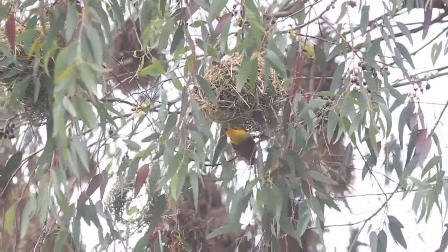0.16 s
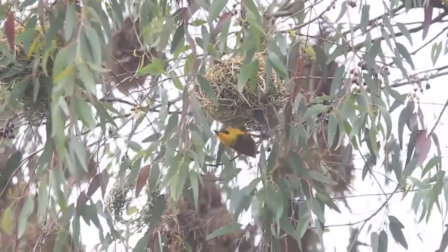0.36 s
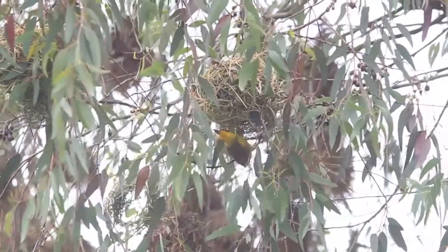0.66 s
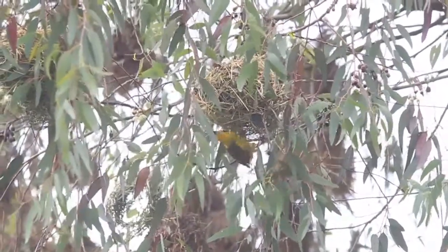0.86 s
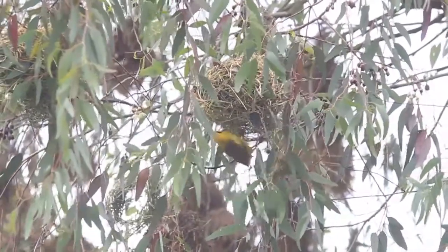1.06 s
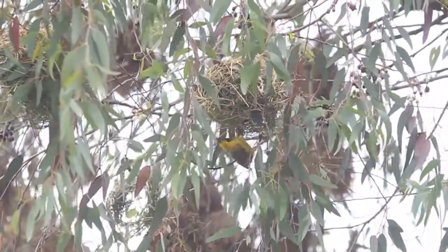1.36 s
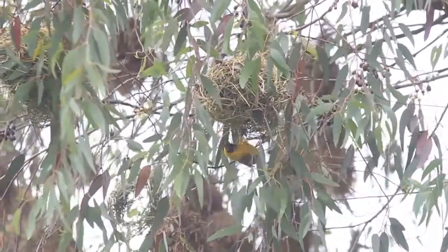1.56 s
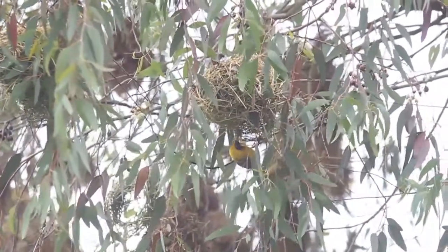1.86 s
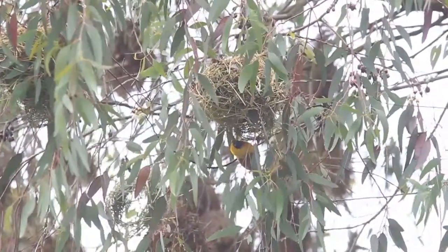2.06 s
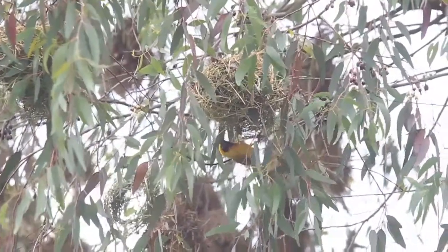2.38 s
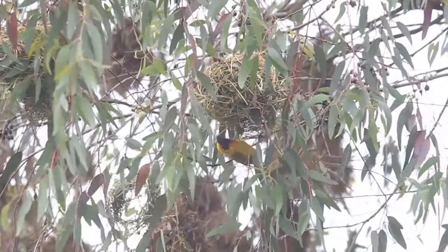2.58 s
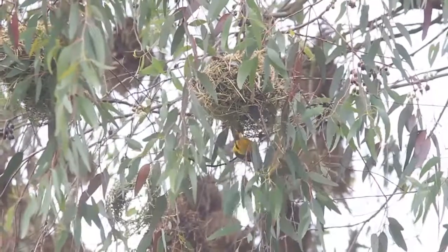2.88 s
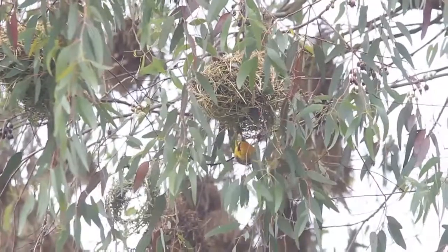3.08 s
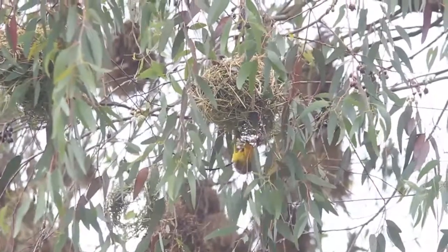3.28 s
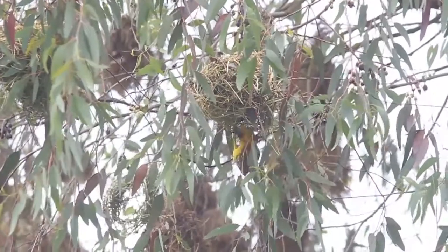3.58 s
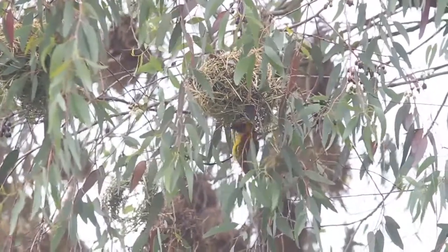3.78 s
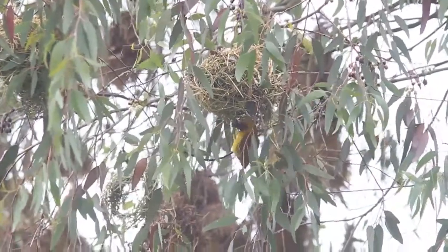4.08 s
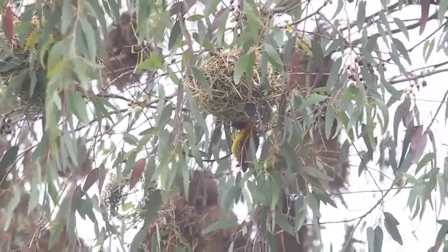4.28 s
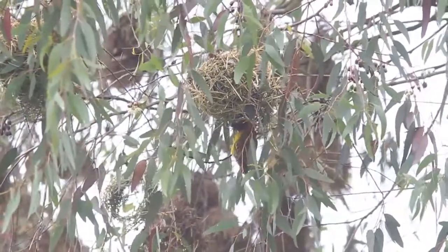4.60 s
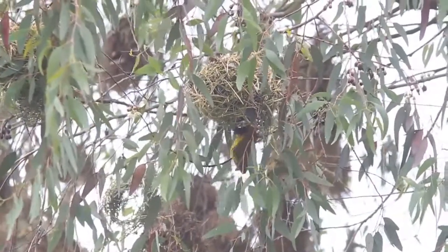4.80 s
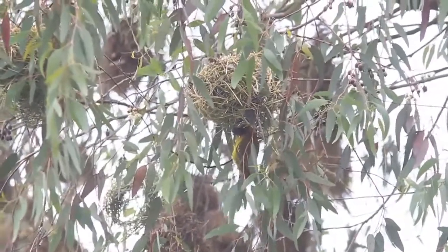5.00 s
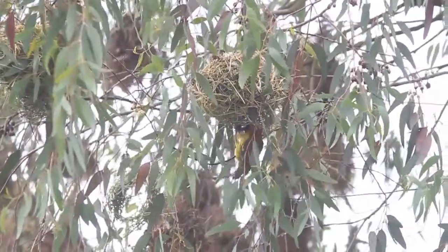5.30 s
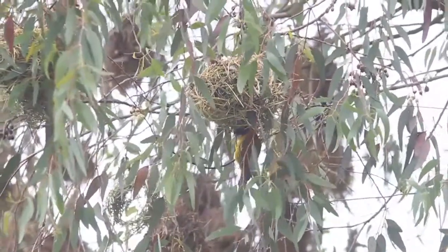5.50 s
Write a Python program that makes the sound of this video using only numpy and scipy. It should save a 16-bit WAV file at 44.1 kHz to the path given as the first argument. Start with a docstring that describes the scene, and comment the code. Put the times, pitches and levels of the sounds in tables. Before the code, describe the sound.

Small birds chip, rasp, whistle and buzz in a tree, ending with a brief rub and sharp knock near the microphone.

```python
"""Weaver colony in a tree

The nearest bird chips and rasps, gives two loud falling whistles, then runs into a pulsed buzzing
song. Whistles and chips are gliding tones; rasps and buzzes are snaps of the syrinx coloured by the
throat. Neighbours slur and twitter behind it over steady air, and the foliage scatters every call.
At the end a small hard body rubs close to the microphone and gives one sharp knock with a rebound."""
import sys
import numpy as np
from scipy import signal
from scipy.fft import rfft, irfft
from scipy.io import wavfile
from scipy.ndimage import uniform_filter1d

SR = 44100
rng = np.random.default_rng(int(sys.argv[2]) if len(sys.argv) > 2 else 0)


def master_out(mix):
    """Clip the mix to full scale and print it as 16-bit PCM to the path in sys.argv[1]."""
    frames = np.transpose(np.atleast_2d(mix))
    ceiling = np.clip(frames, -1, 1)
    pcm = np.round(ceiling * 32767).astype(np.int16)
    wavfile.write(sys.argv[1], SR, pcm)


N = 249165
TIME = np.arange(N) / SR
TOP_HZ = 15500


def undb(db):
    """Decibels to gain."""
    return 10 ** (np.asarray(db) / 20)


def unit(x):
    """Scale to rms 1."""
    return x / np.sqrt(np.mean(x ** 2) + 1e-18)


def add(track, start, sound):
    """Mix a sound into a track at a time in seconds."""
    i = max(int(start * SR), 0)
    track[i:i + len(sound)] += sound[:max(N - i, 0)]


def ramp(length):
    """Progress 0-1 through a note."""
    return np.linspace(0, 1, max(int(length * SR), 8))


def wobble(size, hz):
    """Smooth random modulation with a spread of about 1."""
    k = max(int(SR / hz), 1)
    noise = rng.standard_normal(size + 8 * k)
    return unit(uniform_filter1d(uniform_filter1d(noise, k), k))[4 * k:4 * k + size]


def colour(x, points):
    """EQ by a curve of (f/Hz, level/dB) points."""
    hz, db = np.transpose(points)
    bins = np.maximum(np.fft.rfftfreq(len(x), 1 / SR), 1)
    return irfft(rfft(x) * undb(np.interp(np.log(bins), np.log(hz), db)), len(x))


def resonate(x, hz, width):
    """One resonance, gain 1 at its centre."""
    return signal.lfilter(*signal.iirpeak(hz, hz / width, fs=SR), x)


def cycles(hz):
    """Phase of a moving pitch, in radians."""
    return 2 * np.pi * np.cumsum(hz) / SR


def arch(u, rise, fall):
    """Envelope with attack and release as shares of the note."""
    return np.sin(np.pi / 2 * np.clip(np.minimum(u / rise, (1 - u) / fall), 0, 1))


def note(hz, octave_db, rough, flutter_db=1.5, third_db=-25):
    """One gliding note at rms 1; an unsteady pitch makes it hoarse."""
    phase = cycles(hz * (1 + rough * wobble(len(hz), 1200)))
    overtones = undb(octave_db) * (np.sin(2 * phase) + undb(third_db) * np.sin(3 * phase))
    tone = (np.sin(phase) + overtones) * undb(flutter_db * wobble(len(hz), 113))
    return unit(tone * arch(np.linspace(0, 1, len(hz)), 0.051, 0.36))


def foliage(x, wet_db, t60=0.17, early_t60=0.018, late_db=-11, leaf_hz=2500):
    """Leaves and branches scatter mostly treble: a dense early cloud and a faint longer tail."""
    t = np.arange(SR // 2) / SR
    decay = 1000 ** (-t / early_t60) + undb(late_db) * 1000 ** (-t / t60)
    cloud = rng.standard_normal(len(t)) * decay * (t > .003)  # 3 ms pre-delay
    cloud = signal.sosfilt(signal.butter(2, leaf_hz, "high", fs=SR, output="sos"), cloud)
    return x + undb(wet_db) * signal.fftconvolve(x, cloud / np.linalg.norm(cloud))[:N]


# EQ of the outdoor bed: f/Hz, level/dB
AIR_EQ = [(15, 2), (25, 15), (33, 1), (130, -2.5), (300, -5), (700, -7), (880, -3.5), (1100, -8),
          (2400, -10.5), (3800, -8), (6800, -5.5), (8500, -16.5), (11000, -28.5), (15000, -37.5)]

def air(db=-48.5):
    """A quiet, steady bed of outdoor rumble and hiss."""
    return unit(colour(rng.standard_normal(N), AIR_EQ)) * undb(db)


# fader ride on the distant chatter: t/s, level/dB
COLONY_FADER = [(0, -44), (2.3, -64), (3.4, -59), (5.6, -43.5)]

def colony(count=1100, low_hz=2000, high_hz=6900, octave_db=-17):
    """Many distant chirps blur into a chatter among the leaves."""
    out = np.zeros(N)
    for start, length, pitch, glide, size in rng.random((count, 5)):
        u = ramp(.01 + 0.02 * length)
        sweep_hz = (low_hz + (high_hz - low_hz) * pitch) * (1 + (.2 - 0.5 * glide) * u)
        phase = cycles(sweep_hz * (1 + 0.089 * wobble(len(u), 1500)))
        tone = np.sin(phase) + undb(octave_db) * (1 - pitch) * np.sin(2 * phase)
        add(out, start * N / SR, undb(12 * size) * tone * arch(u, 0.42, 0.3))
    return unit(foliage(out, wet_db=-12)) * undb(np.interp(TIME, *np.transpose(COLONY_FADER)))


def twitter(hz, db, spread, rate=60, bend=0.129, run_s=.11, scatter_db=2.0, run_db=3):
    """A far bird trills on in runs of tiny arched notes, each run at a new pitch and strength."""
    out = np.zeros(N)
    u = ramp(0.63 / rate)
    runs = rng.uniform(-1, 1, (N // 100, 2))
    for k, (late, detune, size) in enumerate(rng.standard_normal((int(N / SR * rate), 3))):
        start = (k + 0.15 * late) / rate
        pitch, effort = runs[int(abs(start) / run_s)]
        arc_hz = hz * (1 + spread * pitch + 0.013 * detune) * (1 - bend * (2 * u - 1) ** 2)
        gain = undb(scatter_db * size + run_db * effort)
        add(out, start, gain * np.sin(cycles(arc_hz)) * arch(u, 0.09, 0.39))
    return undb(db) * unit(out)


# clear slurred notes: t/s, length/s, start f/Hz, middle f/Hz, end f/Hz, level/dB
CLEAR_SLURS = [(.0, 0.074, 1855, 1950, 2010, -49.5), (.225, 0.15, 3050, 2683, 2300, -48.5),
               (1.63, 0.21, 8350, 8400, 8500, -52), (2.106, 0.096, 2480, 2400, 2310, -54),
               (2.20, 0.22, 2450, 1876, 2250, -55), (2.443, 0.086, 2615, 2740, 2920, -46.5),
               (2.518, 0.041, 4370, 4820, 5140, -48.5), (2.524, 0.093, 3310, 2890, 2690, -43.5),
               (2.675, .061, 2730, 2620, 1960, -51), (2.855, 0.051, 3270, 3500, 1890, -37),
               (2.904, .069, 2120, 1660, 1590, -54), (3.33, 0.035, 3500, 4230, 4400, -64),
               (3.675, 0.049, 3620, 3670, 3100, -52), (4.802, 0.1, 2600, 2910, 3020, -42.5),
               (4.942, 0.089, 2650, 2450, 2430, -48)]
# hoarse squawks: t/s, length/s, start f/Hz, middle f/Hz, end f/Hz, level/dB
HOARSE_SQUAWKS = [(.259, .086, 2550, 3165, 3285, -33), (.476, .065, 2830, 3350, 3420, -43)]

def slurs(rows, octave_db, rough):
    """Neighbouring birds bend each note smoothly through three pitches."""
    out = np.zeros(N)
    for start, length, first, middle, last, db in rows:
        hz = np.polyval(np.polyfit([0, .5, 1], [first, middle, last], 2), ramp(length))
        add(out, start, undb(db) * note(hz, octave_db, rough))
    return out


# the near bird's chips: t/s, start f/Hz, level/dB
CHIP_CUES = [(.093, 6300, -33.5), (0.656, 4445, -35.5), (0.806, 4570, -33.5), (.964, 4454, -34),
             (1.218, 4250, -34.5), (1.365, 4450, -32), (1.625, 4450, -32), (1.768, 4500, -31),
             (1.926, 4350, -30.5), (4.434, 4306, -34.5), (4.738, 3986, -32), (4.923, 4140, -38),
             (5.09, 4550, -33), (5.247, 4230, -32.5)]

def chips(length_s=0.02163, fall=0.308, warble_hz=270, warble=0.068, rough=0.067, beak_hz=9200):
    """A warbled downward flick; partway the voice breaks to half pitch and turns harsh."""
    out, u = np.zeros(N), ramp(length_s)
    for start, hz, db in CHIP_CUES:
        vibrato = warble * np.sin(cycles(warble_hz * (1 + 0.213 * wobble(len(u), 196))))
        jitter = rough * (.5 + 2 * u) * wobble(len(u), 2500)
        phase = cycles(hz * (1 - fall * u) * (1 + vibrato + jitter))
        half_tones = undb(-7) * np.sin(phase / 2) + undb(-15) * np.sin(1.5 * phase)
        voice_break = np.clip(2 * u - .3, 0, 1)
        tone = np.sin(phase) + voice_break * half_tones + undb(-19) * np.sin(2 * phase)
        add(out, start, undb(db) * unit(tone * arch(u, .12, .65)))
    return signal.sosfilt(signal.butter(6, beak_hz, fs=SR, output="sos"), out)


def syrinx(size, throat_eq, hz, jitter, hiss_db, ring_s=0.0005):
    """Uneven snaps of the syrinx with a little turbulence, coloured by the throat."""
    pad = 512
    span = size + 2 * pad
    phase = cycles(hz * (1 + jitter * wobble(span, hz))) + 2 * np.pi * rng.random()
    snaps = unit(sum(np.cos(k * phase) for k in range(1, int(TOP_HZ / hz))))
    # the throat rings on for a moment after each snap
    t = np.arange(64) / SR
    ring = rng.standard_normal(len(t)) * np.exp(-t / ring_s)
    smear = np.exp(1j * np.angle(rfft(ring, span)))
    voice = irfft(rfft(snaps) * smear, span) + undb(hiss_db) * rng.standard_normal(span)
    return unit(colour(voice, throat_eq)[pad:pad + size])


# throat EQ of a rasp: f/Hz, level/dB
RASP_EQ = [(400, -24), (900, -10), (1500, -4), (3000, -1), (4200, -6), (5200, -3), (7700, -8),
           (9000, -18.5), (14000, -54.5)]
# single dry ticks: centre t/s, length/s, level/dB
RASP_CUES = [(.128, 0.037, -32.5), (.153, 0.0092, -33), (.363, 0.023, -32), (.396, 0.013, -40.5),
             (.484, .013, -36.5), (.533, 0.02, -35.5), (.739, 0.01, -32), (.894, 0.015, -34.5),
             (1.083, 0.018, -30), (1.155, 0.018, -37), (1.307, 0.012, -34), (1.56, 0.016, -33.5),
             (1.71, 0.015, -31), (1.846, 0.011, -32.5), (2.014, .011, -30), (2.084, 0.011, -31.5),
             (2.195, 0.013, -35.5), (2.538, 0.013, -39.5), (2.777, .015, -32.5), (4.815, 0.029, -34.5),
             (5.458, 0.013, -30)]
# even runs of ticks, the second leading into the song: first t/s, last t/s, gap/s, length/s, level/dB
RASP_RUNS = [(0.703, 1.361, .165, .0065, -32.5), (3.156, 3.422, .0535, .0085, -33)]

def rasps(hz=430, jitter=0.086, hiss_db=-4, squeak_hz=(3500, 4350), full_squeak_from_db=-34):
    """Dry ticks that swell and stop, alone or in even runs; the harder ones squeak more."""
    out = np.zeros(N)
    runs = [(centre, length, db) for first, last, gap, length, db in RASP_RUNS
            for centre in np.linspace(first, last, round((last - first) / gap) + 1)]
    for centre, length, db in list(RASP_CUES) + runs:
        u = ramp(2 * length)
        swell = np.exp(-((u - .5) / .21) ** 2)
        pitch = rng.uniform(*squeak_hz) * (1 + .025 * wobble(len(u), 900))
        squeak = undb(min(db - full_squeak_from_db, 0)) * np.sin(cycles(pitch)) * 2 * u
        voice = syrinx(len(u), RASP_EQ, hz, jitter, hiss_db) + squeak
        add(out, centre - length, undb(db) * swell * unit(voice))
    return out


# quick downward flicks, the last closing the first loud whistle: t/s, length/s, start f/Hz, level/dB
FLICK_CUES = [(0.16, 0.023, 5030, -47), (0.23, 0.016, 5040, -48), (.298, .029, 4820, -48),
              (0.337, 0.023, 6320, -38.5), (1.804, 0.012, 5750, -31.5), (2.495, 0.014, 4100, -43),
              (2.738, 0.0067, 4120, -30.5)]

def flicks(fall_octaves=0.69):
    """Thin, fast downward sweeps, all through the same interval."""
    out = np.zeros(N)
    for start, length, hz, db in FLICK_CUES:
        sweep_hz = hz * 2 ** (-fall_octaves * ramp(length))
        add(out, start, undb(db) * note(sweep_hz, octave_db=-34, rough=0.017))
    return out


# soft bumps among the twigs: t/s, level/dB
BUMP_CUES = [(0.288, -46), (1.053, -45), (3.225, -46.5), (4.81, -42), (5.273, -45.5)]

def bumps(hz=330, width_hz=400, length_s=0.019, dull_hz=1200):
    """Dull little thuds: puffs of noise through one broad, low resonance."""
    out, u = np.zeros(N), ramp(length_s)
    for start, db in BUMP_CUES:
        thud = unit(resonate(rng.standard_normal(len(u)), hz, width_hz))
        add(out, start, undb(db) * thud * arch(u, 0.073, 0.87))
    return signal.sosfilt(signal.butter(2, dull_hz, fs=SR, output="sos"), out)


# a neighbour's repeated "tew": t/s, level/dB
TEW_CUES = [(1.037, -33), (1.441, -31.5), (4.518, -33), (5.317, -31)]

def tews(length_s=0.054, base_hz=3272, drop_hz=875, drop_s=.009, sag_hz_per_s=11000):
    """A clear call whose pitch drops fast and then sags."""
    out, t = np.zeros(N), ramp(length_s) * length_s
    hz = base_hz + drop_hz * np.exp(-t / drop_s) - sag_hz_per_s * t
    for start, db in TEW_CUES:
        add(out, start, undb(db) * note(hz, octave_db=-14, rough=0.017))
    return out


# two loud whistles, one breakpoint curve each: t/s, f/Hz, level/dB
WHISTLE_CURVES = [
    [(2.566, 4764, -28), (2.58, 4740, -25), (2.692, 4351, -24.5), (2.712, 4173, -34.5),
     (2.726, 4090, -22.5), (2.742, 3850, -24.5)],
    [(2.805, 4760, -23.5), (2.815, 4687, -23.5), (2.889, 4493, -23.5), (3.003, 3686, -25),
     (3.069, 3205, -26.5), (3.103, 2780, -34), (3.115, 2660, -35)],
]

def whistles(octave_db=-20, third_db=-43, waver=0.0016, flutter_db=2.0, octave_fade=5):
    """Nearly pure falling tones; the octave overtone fades as the pitch sinks."""
    out = np.zeros(N)
    for curve in WHISTLE_CURVES:
        times, hz, db = np.transpose(curve)
        length = times[-1] - times[0]
        u = ramp(length)
        t = times[0] + u * length
        pitch = np.interp(t, times, hz) * (1 + waver * wobble(len(u), 230))
        phase = cycles(pitch)
        octave = undb(octave_db) * (pitch / hz[0]) ** octave_fade * np.sin(2 * phase)
        tone = np.sin(phase) + octave + undb(third_db) * np.sin(3 * phase)
        gain = undb(np.interp(t, times, db) + flutter_db * wobble(len(u), 110))
        add(out, times[0], np.sqrt(2) * tone * arch(u, .02, 0.023) * gain)
    return out


# throat EQ of the buzzing song: f/Hz, level/dB
BUZZ_EQ = [(500, -36), (700, -20), (900, -8.5), (1100, -9), (1400, -7), (2100, -3), (3000, -4.5), (3750, 1),
           (4900, 1.5), (5900, -7), (8000, -12.5), (10000, -27), (14000, -50)]
# the song's four stages: from t/s, burst rate/Hz, burst length/s, snap f/Hz, hiss level/dB
BUZZ_STAGES = [(3.4, 103, 0.0041, 688.7, -8), (4.04, 173, 0.0036, 719.3, -6),
               (4.45, 93, .0064, 898.6, -0.5), (4.97, 56.7, .012, 913.5, 11.5)]
# its syllables: first burst t/s, length/s, level/dB
BUZZ_CUES = [(3.463, .028, -29), (3.544, .037, -31.5), (3.6354, .046, -30.5), (3.736, .056, -31),
             (3.855, .046, -30), (3.955, .056, -30), (4.061, .051, -31.5), (4.165, .051, -29),
             (4.268, .051, -28.5), (4.361, .067, -30), (4.474, .054, -30.5), (4.6, .086, -30.5),
             (4.73, .075, -30.5), (4.865, .086, -31), (4.991, .085, -32.5), (5.15, .085, -34),
             (5.286, .102, -37), (5.444, .051, -35.5)]

def buzzes(edge_db=-7, scatter_db=1.1, jitter=0.0499):
    """Even trains of hoarse bursts, strongest mid-syllable; the stage of the song sets their texture."""
    out = np.zeros(N)
    for first, length, db in BUZZ_CUES:
        _, rate, burst_s, hz, hiss_db = [stage for stage in BUZZ_STAGES if stage[0] <= first][-1]
        u = ramp(burst_s)
        for k, place in enumerate(np.linspace(-1, 1, round(length * rate) + 1)):
            gain = undb(db + edge_db * place ** 2 + scatter_db * rng.standard_normal())
            burst = syrinx(len(u), BUZZ_EQ, hz, jitter, hiss_db) * arch(u, 0.044, 0.12)
            add(out, first + k / rate - burst_s / 2, gain * burst)
    return out


# resonances of the small hard body: f/Hz, width/Hz, rubbed level/dB, knocked level/dB
BODY_MODES = [(362, 81, -1.5, -2), (943, 85, 7, -25), (1360, 340, 2.5, -8), (1973, 155, 2, 12),
              (2550, 570, 0, -3), (3770, 370, 12.5, 5), (4520, 290, 3, -1), (5410, 180, -4, -4)]
# pushes that swell and ease off: peak t/s, level/dB
PUSH_CUES = [(5.527, -27.5), (5.556, -29), (5.604, -18.5)]

def rub(from_s=5.44, steady_db=-39, rise_s=0.014, fall_s=0.011, grit_db=2, dull_hz=5500):
    """Gritty friction rings the body: a light steady contact with harder pushes on top."""
    friction = rng.standard_normal(N) * undb(grit_db * wobble(N, 714))
    friction = signal.sosfilt(signal.butter(3, dull_hz, fs=SR, output="sos"), friction)
    body = unit(sum(undb(db) * resonate(friction, hz, width) for hz, width, db, _ in BODY_MODES))
    pushes = sum(undb(db) * np.exp(-np.maximum((peak - TIME) / rise_s, (TIME - peak) / fall_s))
                 for peak, db in PUSH_CUES)
    return body * (undb(steady_db) * (TIME > from_s) + pushes)


# the knock and its rebound: t/s, level/dB, decay/s, crack level/dB
KNOCK_CUES = [(5.6075, -7.5, 0.0058, -28), (5.616, -15.5, 0.0034, -10)]

def knock():
    """The friction lets go: each blow rings the same body, with a crack of bare contact noise."""
    out, t = np.zeros(N), np.arange(SR // 20) / SR
    for start, db, decay, crack_db in KNOCK_CUES:
        contact = rng.standard_normal(len(t)) * np.exp(-t / decay)
        ring = sum(undb(mode_db) * np.sqrt(width) * unit(resonate(contact, hz, width))
                   for hz, width, _, mode_db in BODY_MODES)
        blow = unit(ring) + undb(crack_db) * unit(contact)
        add(out, start, undb(db) * blow / np.std(blow[:SR // 200]))  # level set on the first 5 ms
    return out


def handling(band_hz=(290, 9300)):
    """Rub and knock, so close that they round off in the microphone: soft clip, then band-pass."""
    band = signal.ellip(5, 1, 45, band_hz, "band", fs=SR, output="sos")
    return signal.sosfilt(band, np.tanh(rub() + knock()))


def scene():
    """Mono mix: near birds and far trills in the foliage, the colony, air, bumps and handling."""
    clear_notes = tews() + flicks() + slurs(CLEAR_SLURS, octave_db=-22, rough=0.017)
    squawks = slurs(HOARSE_SQUAWKS, octave_db=6.5, rough=0.043)
    calls = chips() + clear_notes + squawks + rasps() + buzzes()
    near = foliage(calls, wet_db=-6.0) + foliage(whistles(), wet_db=-10.0)
    trills = (twitter(hz=7390, db=-53.5, spread=0.049)
              + twitter(hz=6780, db=-52.5, spread=0.017, rate=57, bend=0.07)
              + twitter(hz=5145, db=-56.5, spread=0.037, bend=0.071))
    return (near + foliage(trills, wet_db=-3.5) + colony() + air() + bumps() + handling())[None]


def record(dry):
    """Master: a full-scale clip and a steep treble cut."""
    return signal.sosfilt(signal.ellip(8, .2, 70, TOP_HZ, fs=SR, output="sos"), np.clip(dry, -1, 1))


dry = scene()
out = record(dry)
master_out(out)
```